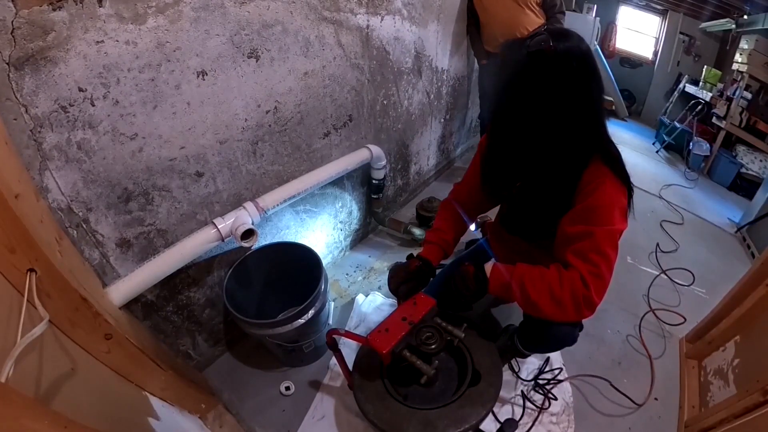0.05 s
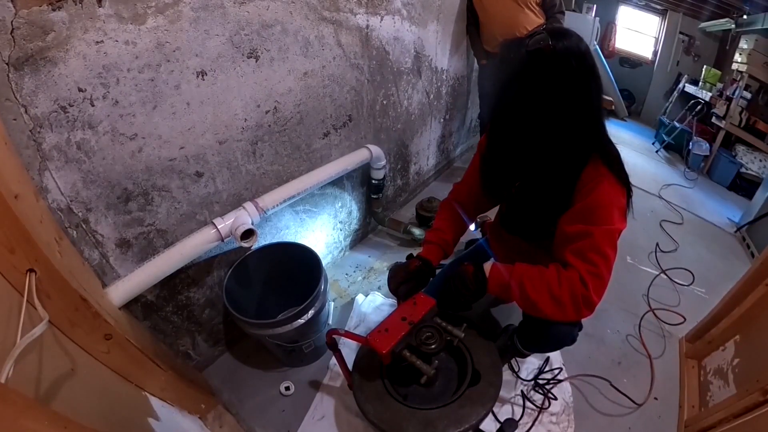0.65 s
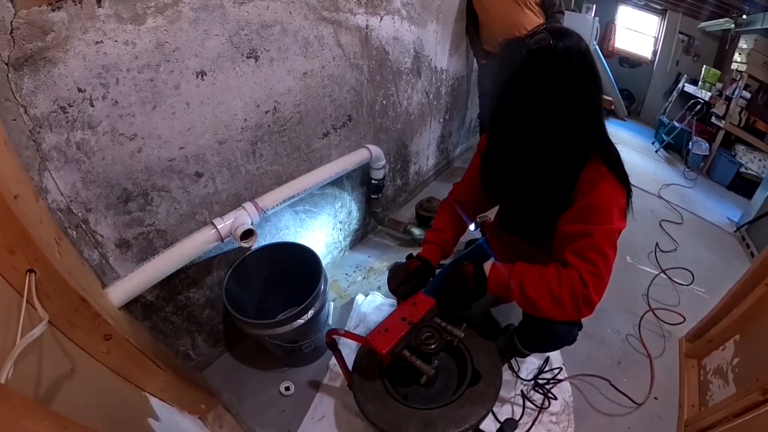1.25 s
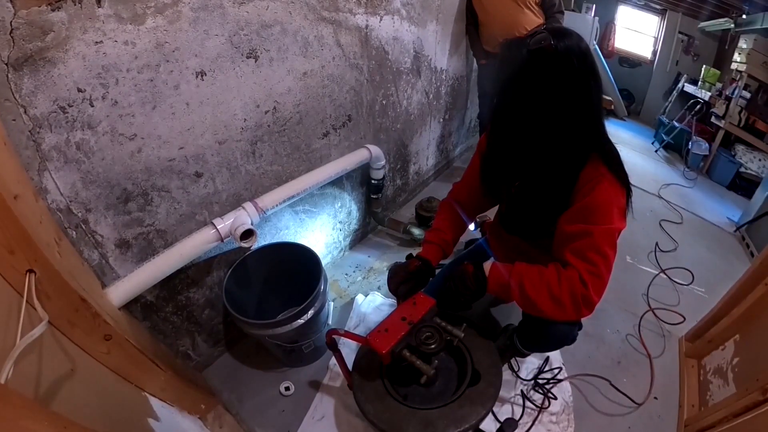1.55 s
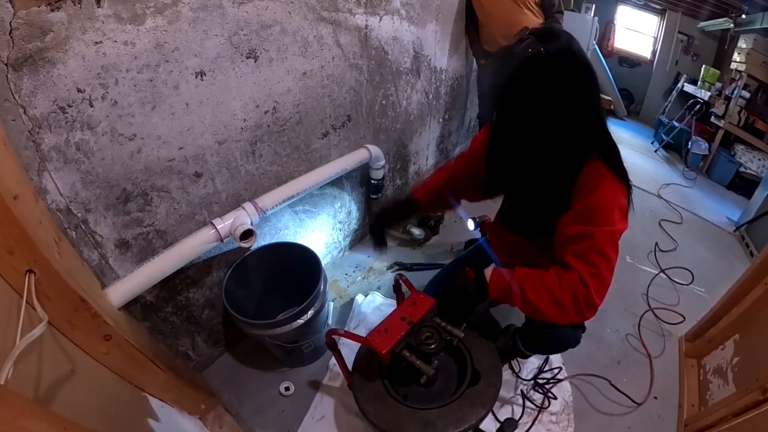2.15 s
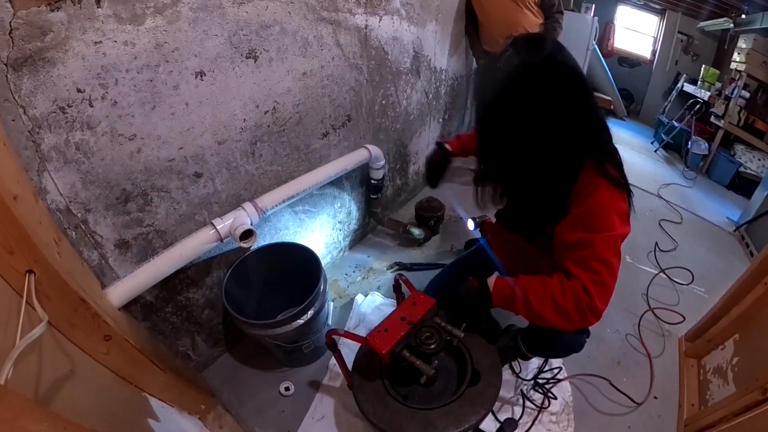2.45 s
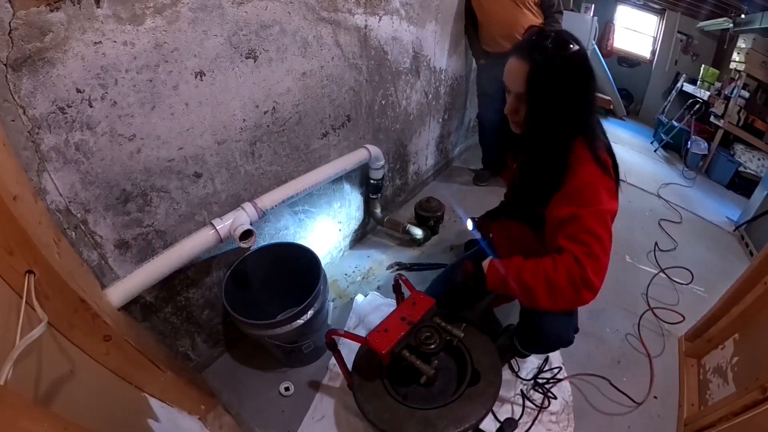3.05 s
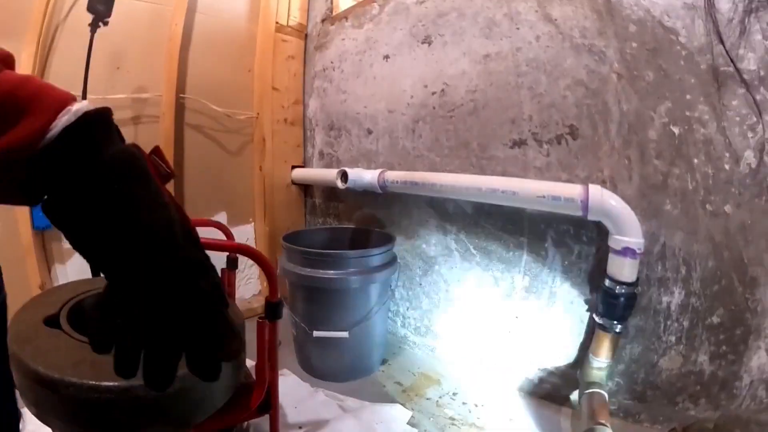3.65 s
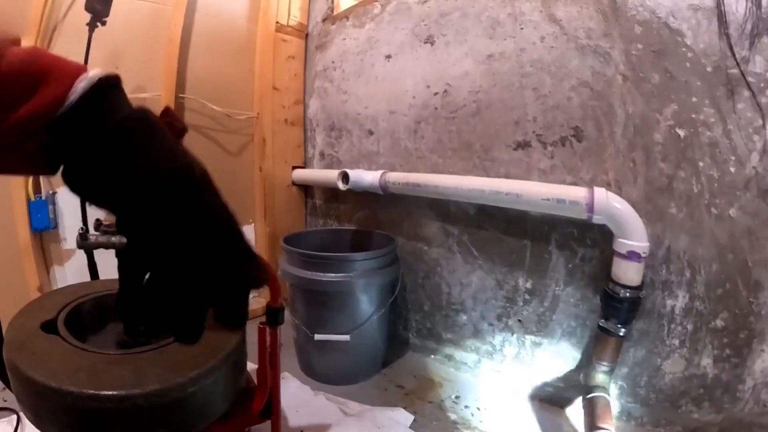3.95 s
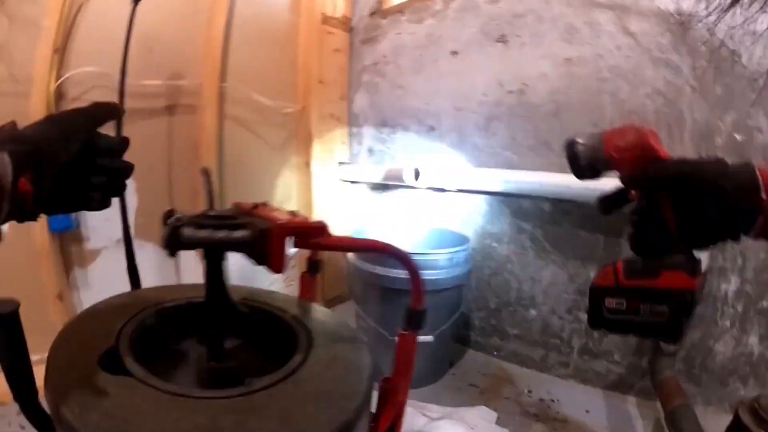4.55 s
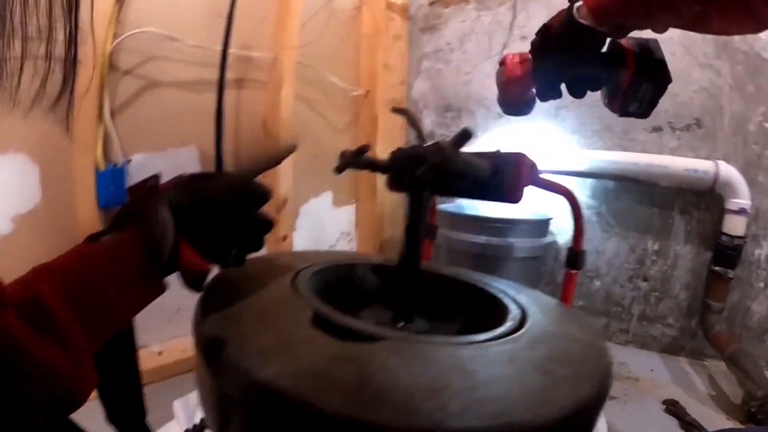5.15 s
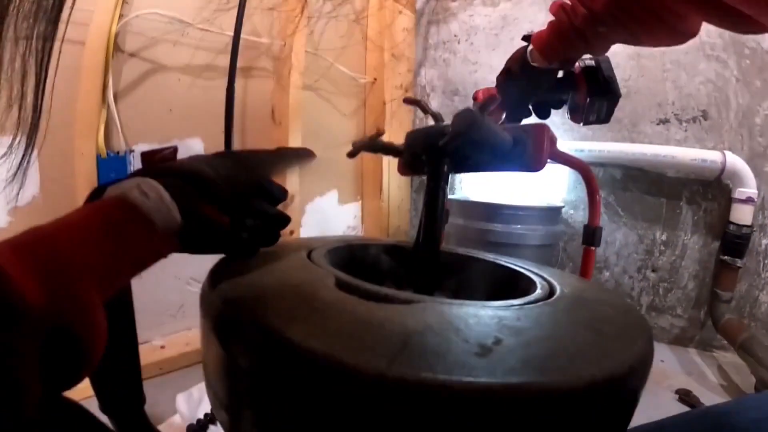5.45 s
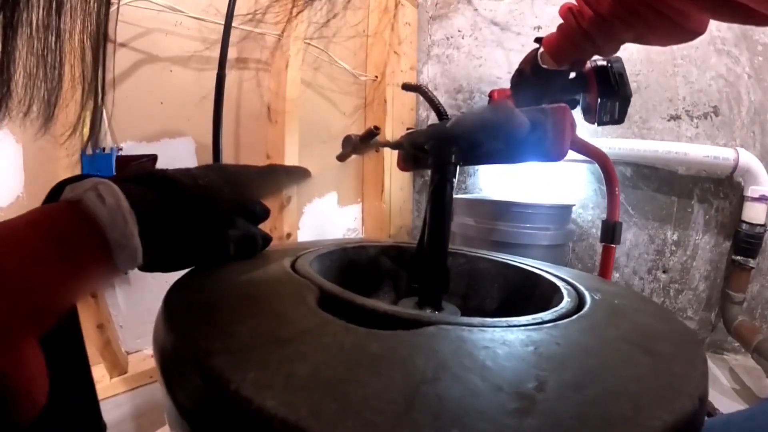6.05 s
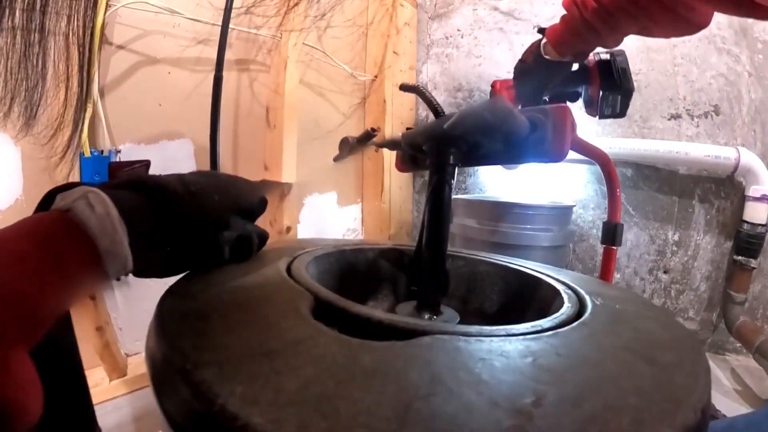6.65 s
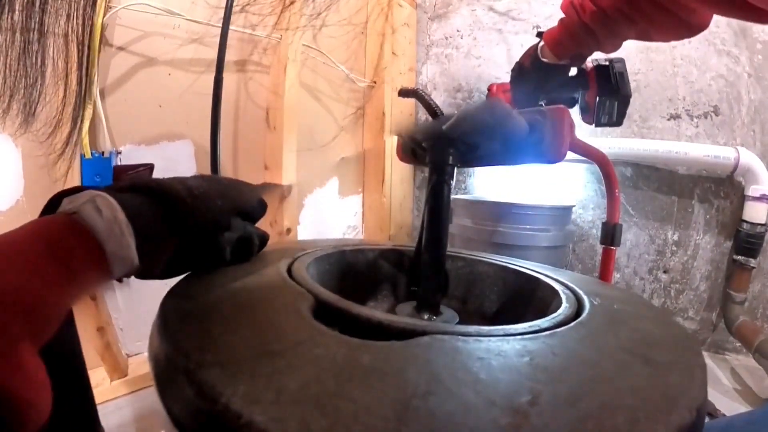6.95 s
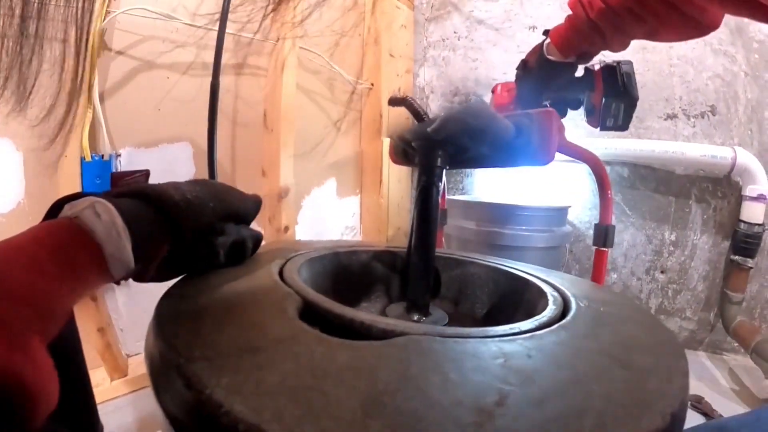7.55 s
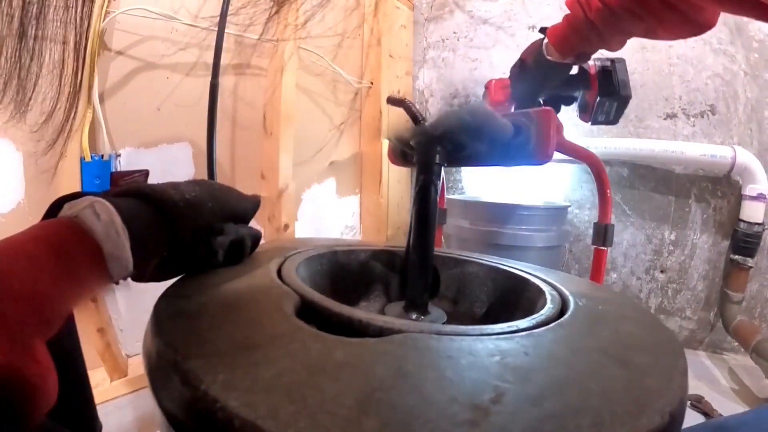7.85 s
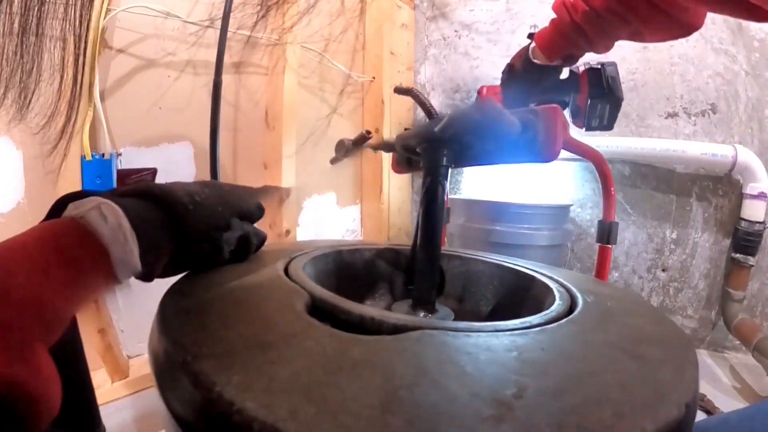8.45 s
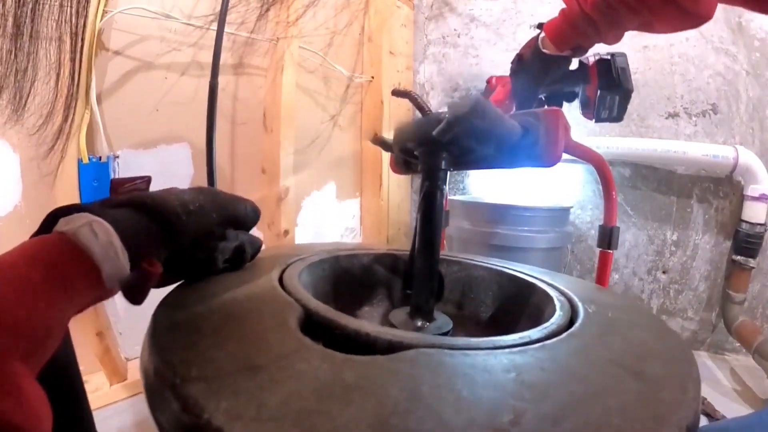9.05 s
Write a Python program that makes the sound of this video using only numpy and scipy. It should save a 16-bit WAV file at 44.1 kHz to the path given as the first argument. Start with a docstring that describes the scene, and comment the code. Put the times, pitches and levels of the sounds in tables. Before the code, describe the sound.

A drain snake machine hums and throbs while its wet steel cable crackles, ticks and clinks back into the drum.

```python
"""A throbbing low drone and a 120 Hz hum over a rush of air: a drain snake machine runs in a concrete
basement while its wet cable is drawn back into the drum. The coils move by stick-slip: water films snap
between them in short crackling runs, and they catch, then tick free, ringing the modes of the steel.
The cable grates and clinks on the guide, knocks the drum and throws off fine spray. Gloves and sleeves
rustle; the microphone is bumped in two brief clusters and moves close to the drum about halfway through."""
import sys
import numpy as np
from scipy import signal
from scipy.fft import rfft, irfft, next_fast_len
from scipy.io import wavfile
from scipy.ndimage import uniform_filter1d

SR = 44100
rng = np.random.default_rng(int(sys.argv[2]) if len(sys.argv) > 2 else 0)


def master(y):
    """Save y as 16-bit WAV."""
    cut = np.clip(np.atleast_2d(y).T, -1, 1)
    pcm = np.round(cut * 32767)  # scale
    wavfile.write(sys.argv[1], SR, pcm.astype(np.int16))


N = 409688
TIME = np.arange(N) / SR


def amp(db):
    """Amplitude ratio of a level in decibels."""
    return 10 ** (np.asarray(db) / 20)


def unit(x):
    """Normalisation to rms 1."""
    return x / np.sqrt(np.mean(x ** 2) + 1e-20)


def follow(curve):
    """Linear interpolation of a (time, value) table at every sample."""
    return np.interp(TIME, *np.transpose(curve))


def read(spectrum, hz):
    """Interpolation of a (frequency, value) table on a logarithmic frequency axis."""
    frequencies, values = np.transpose(spectrum)
    return np.interp(np.log(hz + 1), np.log(frequencies + 1), values)


def colour(x, spectrum):
    """Filtering by multiplication in the frequency domain."""
    size = next_fast_len(N, True)
    gain = amp(read(spectrum, np.fft.rfftfreq(size, 1 / SR)))
    return irfft(rfft(x, size) * gain, size)[:N]


def add(mix, start_s, sound):
    """Superposition: sums a sound into the mix from start_s on."""
    part = mix[max(round(start_s * SR), 0):][:len(sound)]
    part += sound[:len(part)]


def wander(width_hz):
    """Random modulation: the complex envelope, of power 1, of a noise-driven resonance."""
    size = 16384
    hz = np.fft.fftfreq(size, N / SR / size)
    noise = rng.standard_normal((size, 2)) @ [1, 1j]
    sway = np.fft.ifft(np.fft.fft(noise) / (1 + (hz / width_hz) ** 2))
    return np.interp(TIME, np.linspace(0, N / SR, size), sway / np.std(sway))


def resonance(hz, sway):
    """Narrow-band noise of rms 1: a carrier modulated in amplitude and phase by a complex envelope."""
    phase = (2 * np.pi * (hz * TIME % 1)).astype(np.float32)
    return unit(sway.real * np.cos(phase) - sway.imag * np.sin(phase))


def ring(hz, t60, rise_s, length_s):
    """Free decay of one damped mode, with a soft onset and an envelope that peaks at 1."""
    t = np.arange(int(length_s * SR)) / SR
    envelope = amp(-60 * t / t60) * (1 - np.exp(-(t / rise_s) ** 2))
    return envelope / envelope.max() * np.sin(2 * np.pi * hz * t)


def rattle(sound, spread_s, echo_db, first_s=.0006):
    """Early echoes: close rebounds and reflections off the drum follow a contact."""
    delay_s, strength = rng.exponential(spread_s, 40), rng.standard_normal(40)
    taps = np.zeros(SR // 16)
    at = np.minimum(((delay_s + first_s) * SR).astype(int), len(taps) - 1)
    taps[at] = strength * np.exp(-delay_s / spread_s / 2)
    taps *= amp(echo_db) / np.linalg.norm(taps)
    taps[0] = 1
    return signal.fftconvolve(sound, taps)


def strokes(rows, attack_s, release_s):
    """Amplitude envelope: each (start, length, level) row rises, holds and falls away."""
    gain = np.zeros(N)
    for start, length, db in rows:
        t = np.arange(int((attack_s + length + release_s) * SR)) / SR
        hold_end = max(attack_s + length - release_s, 2 * attack_s)
        trapezoid = np.interp(t, [0, 2 * attack_s, hold_end, t[-1]], [0, 1, 1, 0])
        add(gain, start - attack_s, amp(db) * np.sin(np.pi / 2 * trapezoid) ** 2)
    return gain


def impulses(density, length=N):
    """Sparse white noise: a Gaussian impulse on a random fraction of the samples."""
    return rng.standard_normal(length) * (rng.random(length) < density)


def strengths(count, size_db, cap):
    """Random gains whose levels are exponentially distributed, up to cap times size_db."""
    return amp(size_db * np.minimum(rng.exponential(1, count), cap))


def clumps(per_s, decay_s, size_db, floor):
    """Shot-noise envelope: a gain that leaps at random moments and decays exponentially."""
    kicks = np.zeros(N)
    at = np.flatnonzero(rng.random(N) < per_s / SR)
    kicks[at] = strengths(len(at), size_db, cap=2)
    return unit(floor + signal.lfilter([1], [1, -np.exp(-1 / (decay_s * SR))], kicks))


def grains(per_s, size_db, centre_hz, scatter, cycles):
    """A Poisson process of tiny damped rings, their pitches log-normal about centre_hz."""
    pitches = np.geomspace(1200, 14000, 60)
    rings = [ring(hz, t60=cycles / hz, rise_s=3 / hz, length_s=.016) for hz in pitches]
    at = np.flatnonzero(rng.random(N) < per_s / SR)
    gains = strengths(len(at), size_db, cap=3) * rng.choice([-1, 1], len(at))
    centre, spread = (np.broadcast_to(v, N)[at] for v in (centre_hz, scatter))
    grain_hz = centre * np.exp(spread * rng.standard_normal(len(at)))
    pitch_index = np.minimum(np.searchsorted(pitches, grain_hz), len(pitches) - 1)
    out = np.zeros(N)
    for sample, k, gain in zip(at, pitch_index, gains):
        add(out, sample / SR, gain * rings[k])
    return out


# Closeness of the microphone to the drum: (time [s], closeness [0-1])
CLOSENESS = [(0, 0.31), (4.3, 0.07), (5.1, 0.98), (9.29, 0.98)]
def placed(far, near):
    """Position dependence: glides between a value across the machine and one beside the drum."""
    return far + (near - far) * follow(CLOSENESS)


# Decay of the concrete room: (frequency [Hz], reverberation time [s])
BASEMENT_T60 = [(200, 0.82), (2000, 0.28), (6000, 0.19), (14000, 0.19)]
def basement(direct, wet_db):
    """Reverberation: sparse wall reflections follow the direct sound, the treble dying first."""
    reflections = impulses(.12, SR // 2)
    reflections[:SR // 200] = 0  # 5 ms before the first reflection
    hz, t, spectra = signal.stft(reflections, SR, nperseg=256)
    decay = amp(-60 * t / read(BASEMENT_T60, hz)[:, None])
    _, tail = signal.istft(spectra * decay, SR, nperseg=256)
    return direct + amp(wet_db) * signal.oaconvolve(direct, tail / np.linalg.norm(tail))[:N]


# Spectrum of the rumble: (frequency [Hz], relative density [dB])
RUMBLE_SPECTRUM = [(5, -27.5), (15, 15), (28, 0.5), (44, 12.5), (56, 12), (70, -23), (110, 6), (200, -61),
                   (1000, -100)]
# Course of the rumble: (time [s], level [dB])
RUMBLE_LEVEL = [(0, -36.5), (.8, -34.5), (1.3, -37), (2.3, -34), (2.9, -45), (3.2, -29), (3.6, -43),
                (4.3, -37), (4.8, -40), (6.8, -39.5), (8.3, -37), (9.29, -37)]
def rumble(boom_hz=146):
    """Random vibration of the machine and its handling, with a narrow-band boom above the hum."""
    shaking = amp(follow(RUMBLE_LEVEL)) * unit(colour(rng.standard_normal(N), RUMBLE_SPECTRUM))
    boom = amp(placed(far=-53.5, near=-43)) * resonance(boom_hz, wander(width_hz=8.9))
    return shaking + boom


# Air heard across the machine and beside the drum: (frequency [Hz], relative density [dB])
AIR_FAR = [(97, -33), (165, 0.5), (274, -4.5), (299, -5), (327, -1.5), (389, -12), (502, -8), (553, -15.5),
           (593, -16.5), (734, -17), (937, -25), (1060, -20), (1630, -36.5), (1700, -41), (2210, -54),
           (3740, -120)]
AIR_NEAR = [(97, -26.5), (165, -0.5), (189, -10.5), (241, -3.5), (274, -9.5), (478, -8.5), (570, -19.5),
            (666, -23.5), (875, -28), (956, -30), (1260, -30), (1350, -39.5), (1510, -39), (1700, -31),
            (2210, -56), (3740, -120)]
# Resonances of the housing: (frequency [Hz], width [Hz], relative level [dB])
HOUSING_MODES = [(687, 2.7, -67.5), (1080, 26, -73.5), (1343, 26, -66.5), (1795, 14, -71), (2375, 32, -70)]
def air_rush():
    """Flow noise: a broad rush of air, with the narrow resonances of the housing it passes through."""
    near = follow(CLOSENESS)
    far_air, near_air = (unit(colour(rng.standard_normal(N), shape)) for shape in (AIR_FAR, AIR_NEAR))
    air = np.sqrt(1 - near) * far_air + np.sqrt(near) * near_air  # equal-power crossfade
    housing = sum(amp(db) * resonance(hz, wander(width)) for hz, width, db in HOUSING_MODES)
    return amp(placed(far=-44.5, near=-42.5)) * air + amp(placed(far=-2.5, near=-2)) * housing


# Irregular peaks in the drone's level: (start [s], duration [s], relative level [dB])
DRONE_PEAKS = [(0.155, 0.028, -20.5), (0.21, 0.038, -22), (0.487, 0.066, -19.5), (0.612, 0.057, -20.5),
               (0.702, 0.057, -21), (1.055, 0.039, -22), (1.129, 0.053, -22), (1.58, 0.028, -24),
               (1.642, 0.048, -19.5), (1.758, 0.049, -21), (2.495, 0.042, -22), (2.756, 0.03, -20),
               (2.828, 0.05, -23.5), (2.893, 0.09, -24.5), (3.029, 0.036, -20.5), (3.259, 0.18, -21.5),
               (3.48, 0.056, -23), (3.627, 0.041, -22), (3.878, 0.029, -23), (4.17, 0.061, -21),
               (4.68, 0.092, -22), (4.787, 0.072, -20), (5.037, 0.025, -30), (5.172, 0.088, -21),
               (5.387, 0.1, -20), (5.593, 0.028, -23), (5.728, 0.026, -23), (5.974, 0.02, -19.5),
               (6.016, 0.037, -24), (6.223, 0.065, -20.5), (6.347, 0.072, -20), (6.554, 0.031, -20.5),
               (6.803, 0.043, -21.5), (6.883, 0.15, -23), (7.132, 0.049, -22), (7.214, 0.032, -25),
               (7.42, 0.075, -20.5), (7.52, 0.042, -20), (7.688, 0.078, -23), (7.796, 0.061, -22.5),
               (8.134, 0.059, -22), (8.382, 0.096, -20), (8.507, 0.035, -23), (8.786, 0.082, -20.5),
               (9.136, 0.036, -23)]
def drone(hz=77.67, resting_db=-32.5, swell_db=-3.5):
    """Amplitude modulation: a low, noisy drone swells and sinks irregularly."""
    sway = wander(width_hz=9.2)
    swells = amp(swell_db) * strokes(DRONE_PEAKS, attack_s=.023, release_s=.016)
    gain = np.maximum(amp(resting_db) * abs(sway), swells)
    flattened = sway / (abs(sway) + .21)  # keeps the phase drift, evens out the amplitude
    return gain * resonance(hz, flattened)


# Overtones of the hum: (harmonic number, level re fundamental [dB])
HUM_OVERTONES = [(2, -36.5), (5, -41.5)]
def motor_hum(hz=120, waver_db=1.5, throb_db=-.3, throb_hz=7.6):
    """Magnetic force pulses at twice the mains frequency; the tone wavers and throbs a little."""
    phase = 2 * np.pi * hz * TIME + .36 * wander(width_hz=2.5).real
    sway_db = waver_db * wander(width_hz=3.5).real
    sway_db += throb_db * resonance(throb_hz, wander(width_hz=1.6))
    tone = np.sin(phase) + sum(amp(db) * np.sin(k * phase) for k, db in HUM_OVERTONES)
    return amp(placed(far=-31, near=-38) + sway_db) * unit(tone)


# Rubbing of gloves and sleeves: (frequency [Hz], relative density [dB])
RUSTLE_SPECTRUM = [(400, -7), (900, -7.5), (1400, -0.5), (2300, -3.5), (3100, -10.5), (3650, -11.5),
                   (4500, -5.5), (6000, -8), (8000, -19), (10200, -31), (11000, -47.5), (15000, -79)]
# Rustle of the hands working the cable: (time [s], level [dB])
HANDLING_LEVEL = [(0, -61), (.75, -62), (1.35, -67), (1.6, -56), (2, -65.5), (2.4, -55.5), (3.4, -57),
                  (3.8, -59), (4.3, -57), (4.95, -53), (5.2, -56), (5.55, -61), (5.9, -62.5), (6.7, -61.5),
                  (8.4, -64.5), (9.29, -60)]
def rustle(uneven_db=4.5):
    """Friction noise: gloves and sleeves rub in a dense, uneven stream of tiny slips."""
    level_db = follow(HANDLING_LEVEL) + uneven_db * np.tanh(wander(width_hz=23).real)
    slips = impulses(.15) * strengths(N, size_db=3, cap=5)
    lowpass = signal.butter(4, 10500, fs=SR, output="sos")
    return amp(level_db) * unit(signal.sosfilt(lowpass, colour(slips, RUSTLE_SPECTRUM)))


# Passes of a sleeve: (start [s], duration [s], level [dB])
SLEEVE_BRUSHES = [(3.6, 0.58, -57.5), (4.48, 0.1, -55.5), (4.85, .36, -61.5), (8.65, 0.23, -62)]
# Colour of the sleeve: (frequency [Hz], relative density [dB])
SLEEVE_SPECTRUM = [(500, -19), (1000, -7), (1400, -3), (1750, -3), (2300, -19), (2900, -9), (4000, -16),
                   (9000, -47)]
def sleeve(uneven_db=-.5):
    """Friction at close range: a sleeve brushes past the microphone with a hollow, grainy rub."""
    slips = impulses(.04) * strengths(N, size_db=3, cap=4)
    gain = strokes(SLEEVE_BRUSHES, attack_s=.03, release_s=.059)
    gain *= amp(uneven_db * wander(width_hz=3.8).real)
    return gain * unit(colour(slips, SLEEVE_SPECTRUM))


# Blows on the microphone: (time [s], relative level [dB])
MICROPHONE_BUMPS = [(2.48, -19), (2.527, -12), (3.155, -21), (3.205, -23), (3.228, -20)]
# Modes of its mount: (frequency [Hz], relative level [dB], 60 dB decay time [s])
MOUNT_MODES = [(24.1, -6.5, 0.12), (45.3, -8, 0.12), (102, -1, 0.075), (165, -11.5, 0.07)]
def microphone_bumps():
    """Structure-borne sound: soft blows excite the low, heavily damped modes of the mount."""
    out = np.zeros(N)
    bump = sum(amp(db) * ring(hz, t60, rise_s=.0048, length_s=.3) for hz, db, t60 in MOUNT_MODES)
    for s, db in MICROPHONE_BUMPS:
        add(out, s, amp(db) * bump)
    return out


# Blows of the cable on the drum: (time [s], peak level [dB])
DRUM_KNOCKS = [(3.19, -46), (4.72, -32.5), (5.789, -25.5), (5.865, -28.5)]
def drum_knocks():
    """Impact excitation: the cable strikes the drum, and one low mode decays in a dull knock."""
    out = np.zeros(N)
    knock = ring(hz=273.4, t60=.106, rise_s=.0042, length_s=.3)
    for s, db in DRUM_KNOCKS:
        add(out, s, amp(db) * knock)
    return out


def clatter(uneven_db=3):
    """Random impacts: loose turns of cable tap the drum's wall and rebound."""
    taps = grains(per_s=170, size_db=3, centre_hz=2250, scatter=.22, cycles=14)
    rebounding = rattle(taps, spread_s=.006, echo_db=-3)[:N]
    level_db = placed(far=-68, near=-65) + uneven_db * wander(width_hz=9.1).real
    return basement(amp(level_db) * unit(rebounding), wet_db=-2.5)


# Tearing water film: (frequency [Hz], relative density [dB])
SIZZLE_SPECTRUM = [(7000, -26), (9500, 1), (10700, 2), (11300, -7), (13500, -10), (15500, -18)]
def sizzle(handled_db=-25, uneven_db=5):
    """Film rupture: water tears finely under the gloves, a thin sizzle that comes and goes."""
    tears = impulses(.12)
    level_db = follow(HANDLING_LEVEL) + handled_db + uneven_db * np.tanh(2 * wander(width_hz=9).real)
    return amp(level_db) * unit(colour(tears, SIZZLE_SPECTRUM))


# Fine spits of water: (time [s], relative level [dB])
WATER_SPITS = [(0.262, -51), (2.389, -44), (2.405, -47), (2.533, -53), (2.661, -52), (2.969, -57),
               (3.172, -55), (3.29, -61), (3.599, -57), (4.189, -53), (4.546, -53), (4.605, -57),
               (4.68, -56), (4.66, -56), (4.825, -57), (4.97, -54), (5.589, -52), (7.844, -51.5),
               (8.215, -51), (8.378, -57), (8.408, -57)]
def spits(decay_s=.0093, rise_s=.0012):
    """Transient noise: each spit of water is a bright burst of drops that decays exponentially."""
    out, t = np.zeros(N), np.arange(SR // 16) / SR
    envelope = np.exp(-t / decay_s) * (1 - np.exp(-t / rise_s))
    for s, db in WATER_SPITS:
        add(out, s, amp(db + 12) * envelope * impulses(.1, len(t)))
    # (frequency [Hz], gain [dB])
    bright = [(1000, -21), (4000, -14), (7000, 10), (9500, 10), (11500, -14), (14500, -14), (16000, -38)]
    return basement(colour(out, bright), wet_db=-15)


# Strikes on the guide: (time [s], relative level [dB], frequency [Hz])
GUIDE_CLINKS = [(0.101, -46, 2190), (0.789, -50, 2060), (0.979, -44.5, 2250), (1.193, -37, 2100),
                (1.215, -49, 1930), (1.24, -52, 1860), (2.459, -47.5, 1840), (2.747, -44.5, 2680),
                (2.808, -44.5, 3020), (2.87, -47.5, 3130), (3.085, -39.5, 1780), (3.295, -49, 2020),
                (3.415, -48, 3140), (3.589, -46, 1470), (4.518, -47, 2070), (4.534, -56, 3100),
                (4.686, -51, 2520), (4.794, -50, 2060), (4.961, -53, 1540), (5.24, -48, 2370),
                (5.389, -50, 2230), (5.761, -41.5, 1860), (5.793, -49.5, 1730), (5.847, -50, 1870),
                (5.882, -55, 2880), (6.047, -48, 2520), (6.338, -50, 1790), (6.493, -43.5, 1910),
                (6.505, -49, 2360), (6.637, -40.5, 1780), (6.646, -44.5, 2900), (6.661, -49, 2570),
                (6.776, -52, 2550), (7.276, -44.5, 2550), (7.539, -45, 1910), (7.707, -47, 1770),
                (7.761, -54, 3240), (7.841, -48, 2570), (8.024, -49, 1900), (8.625, -47, 2390),
                (9.174, -49, 2520)]
def clinks(upper_db=-12, scrape_db=-18):
    """Modal ringing: the cable strikes the guide, sounding two close modes, a higher one and a scrape."""
    out, t = np.zeros(N), np.arange(SR // 17) / SR
    lowpass = signal.butter(4, 4500, fs=SR, output="sos")
    for s, db, hz in GUIDE_CLINKS:
        pair = ring(hz, t60=.016, rise_s=.0015, length_s=.04)
        pair += .5 * ring(hz * 1.07, t60=.01, rise_s=.0008, length_s=.04)
        upper = ring(hz * rng.uniform(1.12, 1.5), t60=.0065, rise_s=.0016, length_s=.02)
        clink = rattle(pair, spread_s=.007, echo_db=-1)
        add(clink, 0, amp(upper_db) * rattle(upper, spread_s=.014, echo_db=2.5))
        scraping = rng.standard_normal(len(t)) * np.exp(-t / .016)
        add(clink, 0, amp(scrape_db) * signal.sosfilt(lowpass, scraping))
        add(out, s, amp(db + 3.5) * clink / abs(clink).max())
    return basement(out, wet_db=-6.5)


# Response of the machine to a contact: (frequency [Hz], gain [dB])
MACHINE_RESPONSE = [(800, -11), (2000, -13.5), (3100, -2.5), (3700, -5), (4050, -0.5), (4550, -4.5),
                    (5200, 2), (6050, -2.5), (6900, -1.5), (7400, 2.5), (8400, -7.5), (10400, -20),
                    (11100, -17.5), (15000, -21)]
# Modes of the steel coil: (frequency [Hz], bandwidth [Hz], gain re plain contact [dB])
COIL_MODES = [(4150, 42, 9.5), (4730, 55, 9.5), (5100, 110, -1.5), (5360, 67, -1.5), (5600, 86, -10),
              (6020, 113, 4), (6370, 87, 0), (6600, 46, 3), (7020, 74, -1), (7400, 24, 6.5),
              (8650, 110, -6), (9520, 140, 6.5)]
def coil(contacts, detune=.0045, bend_hz=5):
    """Resonant filtering: the machine and the coil's modes, which shift as it bends, colour contacts."""
    size, lead = 4096, 256
    hz = np.fft.rfftfreq(size, 1 / SR)
    bend, out = np.clip(2 * wander(bend_hz).real, -1, 1), np.zeros(N)
    for side in (-1, 0, 1):  # crossfade between flat, centred and sharp tunings
        tuning = 1 + side * detune
        modes = 1 + sum(amp(db) / (1 + 2j * (hz - f * tuning) / width) for f, width, db in COIL_MODES)
        response = np.roll(irfft(amp(read(MACHINE_RESPONSE, hz)) * modes, size), lead)
        share = np.maximum(1 - abs(bend - side), 0)
        out += signal.oaconvolve(contacts * share, response)[lead:lead + N]
    return out


# Hard rubs on the guide: (start [s], duration [s], level [dB], frequency [Hz])
GUIDE_RASPS = [(0.175, 0.018, -57, 3910), (0.321, 0.025, -58, 4220), (0.99, 0.035, -59, 4050),
               (1.82, 0.027, -59, 3930), (2.395, 0.02, -53.5, 3350), (3.108, 0.024, -54, 4200),
               (3.332, 0.018, -60, 4170), (3.423, 0.029, -61, 4160), (4.132, 0.068, -60, 4220),
               (4.922, 0.014, -47.5, 3900), (5.012, 0.015, -49, 3800), (5.238, 0.019, -58, 4250),
               (7.842, 0.011, -61, 3700), (8.103, 0.025, -55, 4280), (8.147, 0.029, -59, 4210),
               (8.953, 0.011, -57, 4260)]
def rasps(grit_db=-5):
    """Frictional chatter: runs of catches on the guide ring at nearly one pitch, over wider grit."""
    start, length, db, hz = np.transpose(GUIDE_RASPS)
    centre_hz = np.interp(TIME, start + length / 2, hz)
    chatter = grains(per_s=600, size_db=2.5, centre_hz=centre_hz, scatter=.045, cycles=42)
    grit = grains(per_s=550, size_db=3.5, centre_hz=4000, scatter=.14, cycles=24)
    gain = strokes(zip(start, length, db), attack_s=.0028, release_s=.0044)
    return basement(gain * unit(unit(chatter) + amp(grit_db) * unit(coil(grit))), wet_db=-3)


# Slides of the wet coils over each other:
# (start [s], duration [s], relative crackle level [dB], frequency [Hz], relative scrape level [dB])
COIL_SLIDES = [(0.034, 0.056, -52, 6000, -68), (0.178, 0.043, -40, 5900, -80),
               (0.302, 0.062, -42, 6170, -72), (0.474, 0.099, -52, 5720, -79),
               (0.674, 0.041, -49, 5680, -55), (0.725, 0.1, -50, 5830, -77), (0.929, 0.031, -52, 5770, -75),
               (1.004, 0.023, -40, 6160, -66), (1.208, 0.051, -35, 5650, -62),
               (1.381, 0.028, -38, 5780, -68), (1.557, 0.059, -50, 5570, -64),
               (1.665, 0.031, -48, 6150, -58), (1.758, 0.11, -56, 5420, -64),
               (1.968, 0.041, -50, 5640, -78), (2.138, 0.09, -42, 5870, -57.5),
               (2.347, 0.16, -50, 5900, -59), (2.697, 0.081, -48, 5870, -56), (2.8, 0.039, -46, 5830, -67),
               (2.9, 0.085, -51, 5900, -62), (3.027, 0.12, -53, 6050, -53.5),
               (3.32, 0.143, -50.5, 5860, -61), (3.793, 0.17, -52, 5900, -74),
               (4.126, 0.06, -50, 5950, -62), (4.428, 0.054, -36, 6080, -64),
               (4.532, 0.019, -40, 6150, -51), (4.7, 0.035, -31, 6250, -56), (4.84, 0.24, -44, 6380, -58),
               (5.484, 0.053, -52, 6170, -55.5), (5.83, 0.036, -40, 5250, -67),
               (6.11, 0.036, -47, 6200, -57), (6.261, 0.034, -49, 5200, -54),
               (6.632, 0.14, -54.5, 6300, -57.5), (6.763, 0.027, -42, 6470, -67),
               (6.823, 0.02, -55, 5900, -53), (6.898, 0.038, -51, 6600, -68),
               (7.074, 0.041, -51, 6600, -65), (7.234, 0.16, -48.5, 6100, -58),
               (7.495, 0.085, -50.5, 5550, -56), (7.748, 0.057, -52, 6460, -54),
               (7.83, 0.069, -50, 6660, -71), (8.173, 0.054, -48, 6240, -55.5),
               (8.337, 0.015, -44, 6400, -76), (8.525, 0.034, -46, 6660, -68),
               (8.898, 0.096, -53, 6170, -65), (9.045, 0.048, -44, 6160, -56),
               (9.125, 0.034, -51, 5850, -74), (9.238, 0.025, -45, 6240, -71)]
SLIDE_START, SLIDE_LENGTH, CRACKLE_DB, SLIDE_HZ, SCRAPE_DB = np.transpose(COIL_SLIDES)
def slides(levels_db, limit_db=np.inf):
    """Envelope of intermittent sliding: a fast attack and slower release, each level held to a limit."""
    rows = zip(SLIDE_START, SLIDE_LENGTH, np.minimum(levels_db, limit_db))
    return strokes(rows, attack_s=.0033, release_s=.022)


def scrape(slide_db=-4, uneven_db=4):
    """Roughness noise: the cable's spiral grates through the guide in small catches, most in a slide."""
    grating = amp(placed(far=-69, near=-67) + uneven_db * wander(width_hz=47).real)
    gain = np.hypot(grating, amp(slide_db) * slides(SCRAPE_DB))
    catches = grains(per_s=1100, size_db=3.2, centre_hz=2650, scatter=.2, cycles=32)
    return basement(gain * unit(coil(catches)), wet_db=-7.5)


def water_gain(handled_db=-14, thrown_db=-24):
    """Incoherent sources add in power: water stirred by the hands and water thrown off by slides."""
    handled = amp(follow(HANDLING_LEVEL) + handled_db)
    thrown = amp(thrown_db) * slides(CRACKLE_DB, limit_db=-39.5)
    return np.hypot(handled, thrown)


# Colour of the bursting bubbles: (frequency [Hz], gain [dB])
BUBBLE_COLOUR = [(6000, 5.5), (7500, 4), (9400, -4), (10800, -4.5), (11500, -12.5), (14000, -12.5)]
def bubbles(cluster_db=7):
    """Bubble resonance: tiny bubbles burst in clusters on cable and gloves, each with a high ping."""
    pings = grains(per_s=240, size_db=3.8, centre_hz=8900, scatter=.12, cycles=100)
    pings *= amp(cluster_db * np.clip(wander(width_hz=12).real, -1, 1))
    return basement(water_gain() * unit(colour(pings, BUBBLE_COLOUR)), wet_db=-2.5)


# Fine spray of water: (frequency [Hz], relative density [dB])
SPRAY_SPECTRUM = [(5000, -37), (7000, -16.5), (8200, -4), (10000, -4.5), (11200, -10), (13000, -14),
                  (15500, -19.5)]
def spray(drops_db=-2):
    """Shot noise: tiny droplets fizz off the cable in soft spurts, more with slides and handling."""
    gain = np.hypot(amp(placed(far=-67, near=-68.5)), water_gain())
    spurts = clumps(per_s=24, decay_s=.018, size_db=3.8, floor=.6)
    soft_spurts = unit(uniform_filter1d(spurts, size=300))
    fizz = colour(impulses(.08), SPRAY_SPECTRUM)
    drops = grains(per_s=700, size_db=5, centre_hz=8800, scatter=.08, cycles=90)
    water = coil(unit(fizz) + amp(drops_db) * unit(drops))
    return basement(gain * soft_spurts * unit(water), wet_db=-17)


def crackle(slide_db=-4):
    """Film rupture: water snaps between the coils, in runs as they slide and in clumps as they creep."""
    centre_hz = np.interp(TIME, SLIDE_START + SLIDE_LENGTH / 2, SLIDE_HZ)
    scatter = placed(far=.068, near=.12)
    snaps = grains(per_s=350, size_db=4.3, centre_hz=centre_hz, scatter=scatter, cycles=27)
    creep = grains(per_s=460, size_db=4.3, centre_hz=6050, scatter=scatter, cycles=36)
    creep *= clumps(per_s=20, decay_s=.016, size_db=4.5, floor=.45)
    sliding = amp(slide_db) * slides(CRACKLE_DB, limit_db=-48.5) * unit(coil(snaps))
    creeping = amp(placed(far=-59, near=-59.5)) * unit(coil(creep))
    return basement(sliding + creeping, wet_db=-5)


# Loudest snaps of the wet coils: (time [s], relative level [dB], frequency [Hz])
COIL_TICKS = [(0.0685, -22, 6150), (0.183, -30, 5600), (0.325, -33, 6000), (0.3427, -28, 6350),
              (0.553, -34, 5740), (0.651, -33, 6400), (0.7533, -35, 6260), (0.821, -31.5, 6400),
              (0.964, -33, 6300), (1.0138, -31, 6040), (1.024, -36, 6070), (1.1714, -32, 6140),
              (1.222, -32.5, 6250), (1.244, -37, 6060), (1.4003, -23.5, 5500), (1.408, -25.5, 5760),
              (1.549, -30.5, 6300), (1.6056, -29, 5650), (1.765, -34, 6250), (1.8067, -32, 5600),
              (2.158, -25, 5700), (2.178, -36, 5300), (2.3645, -34, 6100), (2.437, -20.5, 6000),
              (2.729, -34, 5870), (2.7934, -35, 5770), (2.8898, -32, 5900), (2.926, -30, 6140),
              (3.05, -33, 5930), (3.06, -31, 5900), (3.124, -29.5, 5570), (3.3284, -35, 7340),
              (3.8127, -25, 7650), (3.912, -32, 6530), (4.158, -33, 6240), (4.4508, -31, 5800),
              (4.695, -32, 6340), (4.717, -38, 6350), (4.852, -33, 5800), (4.874, -35, 6800),
              (4.8862, -28.5, 6700), (4.906, -30, 6600), (4.945, -34, 6940), (4.965, -31, 7200),
              (4.996, -30.5, 7120), (5.016, -28, 6900), (5.071, -41, 5130), (5.133, -31, 5700),
              (5.4994, -28.5, 6030), (5.843, -27, 5730), (5.942, -35, 6400), (6.125, -37, 6050),
              (6.2513, -31, 5800), (6.308, -30.5, 5140), (6.647, -33, 6800), (6.664, -30.5, 6400),
              (6.698, -35, 5900), (6.803, -29.5, 6070), (6.848, -36, 5750), (6.891, -34, 5060),
              (6.9044, -28, 6680), (6.992, -38, 7200), (7.0276, -32, 5760), (7.124, -39, 7500),
              (7.234, -35, 6040), (7.256, -37.5, 6740), (7.2796, -20.5, 5730), (7.294, -35, 5750),
              (7.321, -34, 6250), (7.341, -34, 6040), (7.357, -33, 6270), (8.1924, -30.5, 5970),
              (8.334, -36, 6500), (8.458, -30, 6200), (8.537, -22.5, 6100), (8.893, -29.5, 6080)]
def ticks(snap_db=-7.5, side_db=-11, slip_db=-22):
    """Stick-slip release: a faint slip, then a ping with weaker rings either side and quick rebounds."""
    out = np.zeros(N)
    for s, db, hz in COIL_TICKS:
        low, main, high = (ring(hz * k, t60=.0042, rise_s=.0014, length_s=.009) for k in (.87, 1, 1.14))
        snap = rattle(main, spread_s=.003, echo_db=1, first_s=.0017)
        for side in (low, high):
            add(snap, rng.uniform(0, .0012), amp(side_db) * rattle(side, spread_s=.004, echo_db=0))
        slip = rattle(main + low, spread_s=.004, echo_db=6)
        add(out, s - .0005, amp(db + snap_db) * snap / abs(snap).max())
        add(out, s - rng.uniform(.0027, .007), amp(db + slip_db) * slip / abs(slip).max())
    return basement(coil(out), wet_db=-9)


def sticking(stick_s=.017, dip_db=-7):
    """Static friction: a gain that sinks while a coil sticks before each tick, then springs back."""
    gain = np.ones(N)
    dip = np.linspace(1, amp(dip_db), int(stick_s * SR))
    for s, _, _ in COIL_TICKS:
        end = round(s * SR)
        gain[max(end - len(dip), 0):end] *= dip[-end:]
    return uniform_filter1d(gain, size=44)  # 1 ms of smoothing


def scene():
    """Superposition of the wet cable, the running machine and the handling in one channel."""
    sliding = (crackle() + spray() + sizzle() + bubbles() + scrape()) * sticking()
    cable = sliding + rasps() + ticks() + clinks() + clatter() + spits() + drum_knocks()
    machine = motor_hum() + drone() + rumble() + air_rush()
    handling = rustle() + sleeve() + microphone_bumps()
    return (machine + handling + cable)[None]


def record(dry):
    """Band limiting: a linear-phase low-pass filter removes the highest treble."""
    lowpass = signal.firwin(511, cutoff=15600, window=("kaiser", 9), fs=SR)
    return signal.oaconvolve(dry, lowpass[None], "same")


dry = scene()
out = record(dry)
master(out)
```